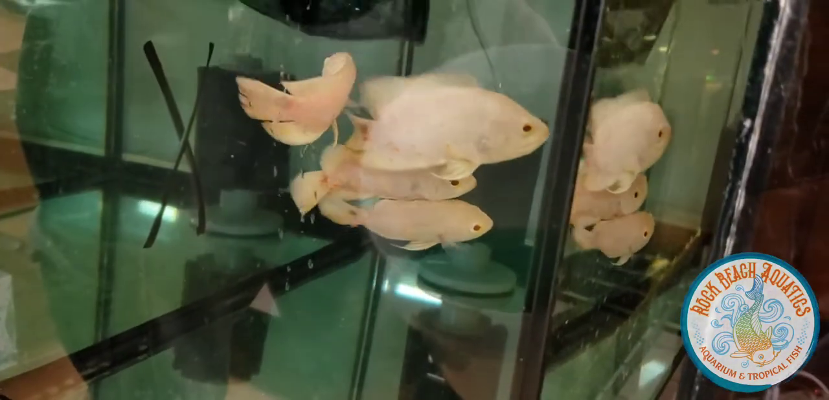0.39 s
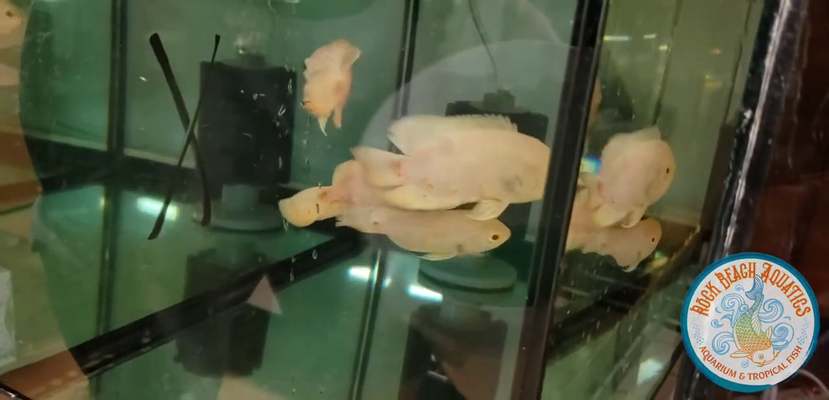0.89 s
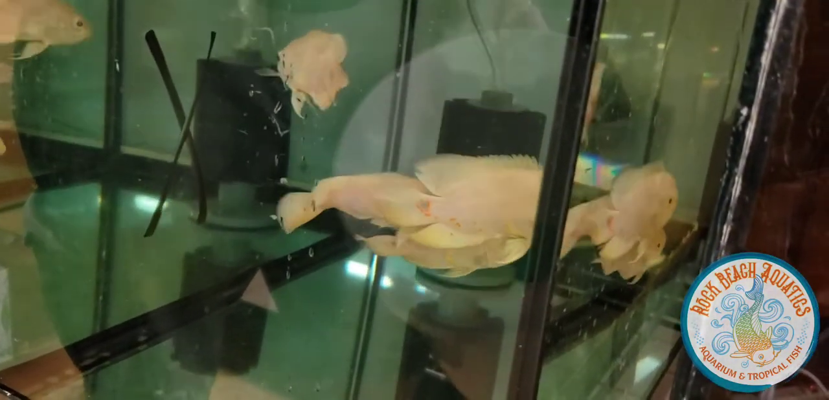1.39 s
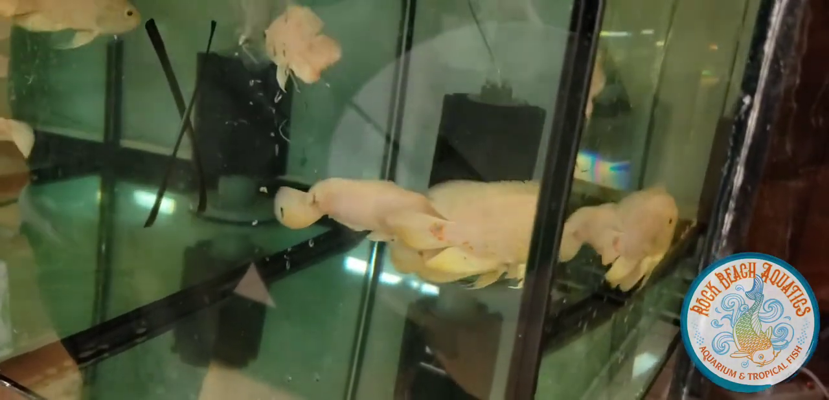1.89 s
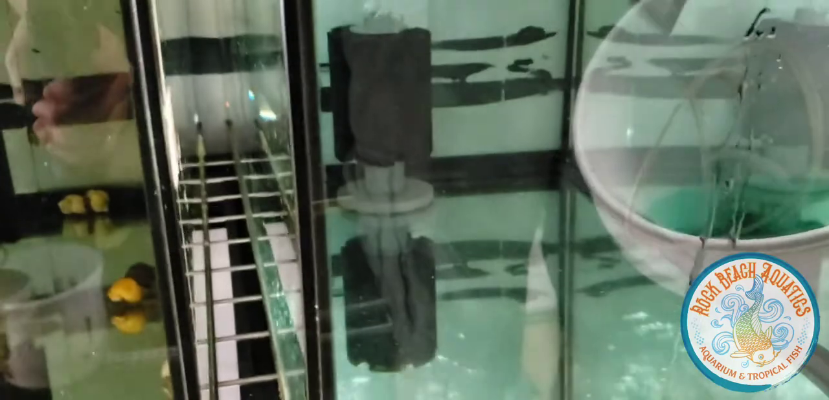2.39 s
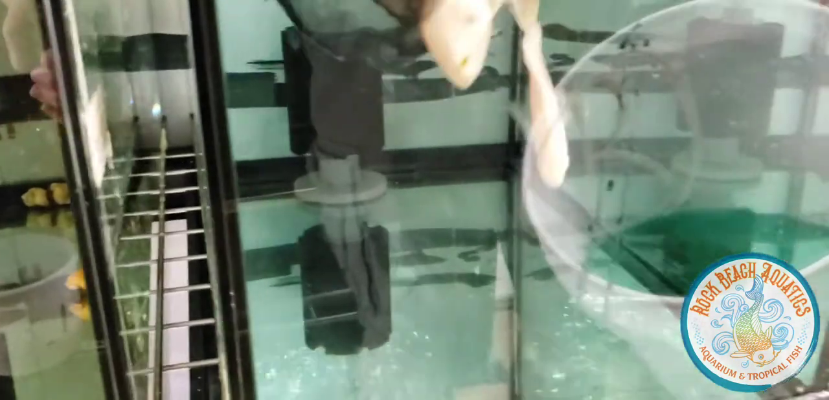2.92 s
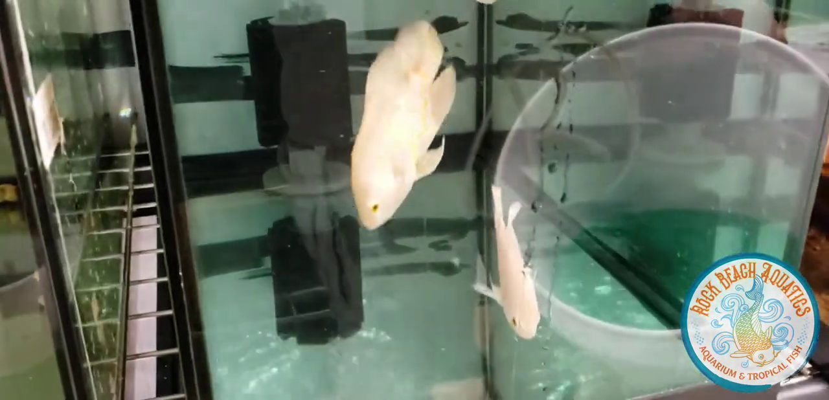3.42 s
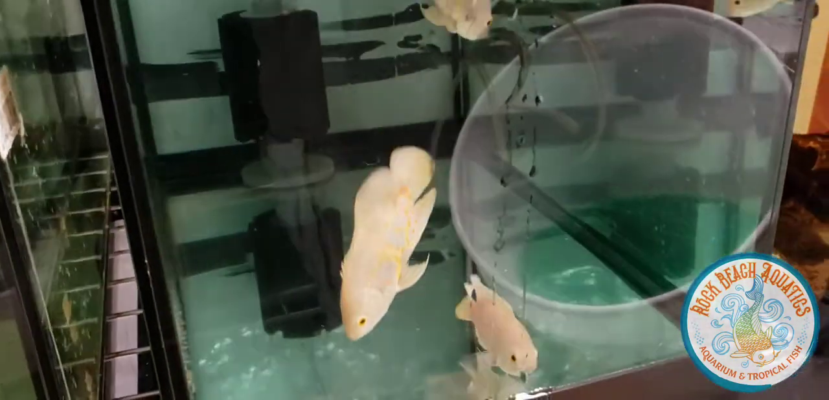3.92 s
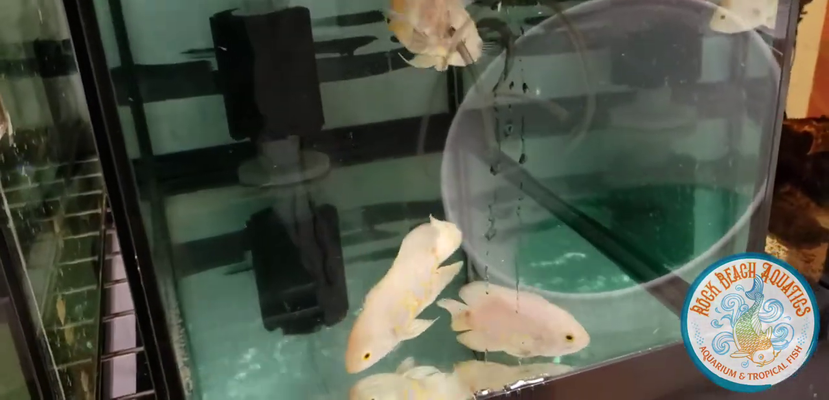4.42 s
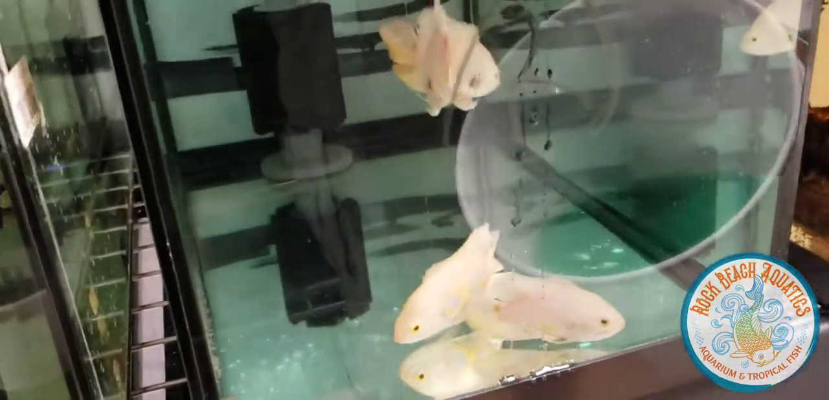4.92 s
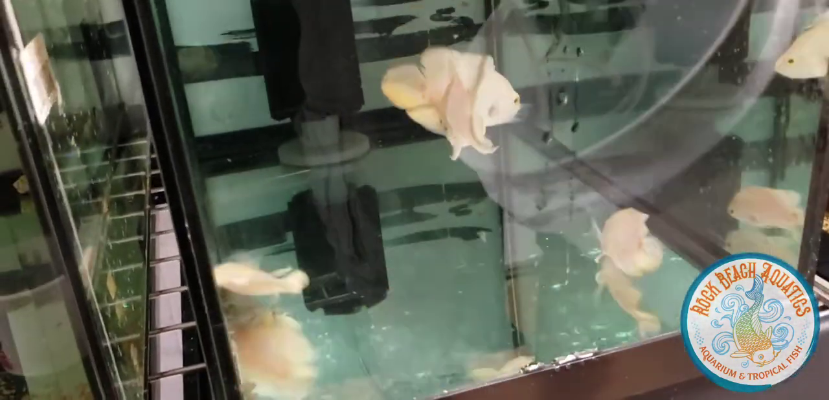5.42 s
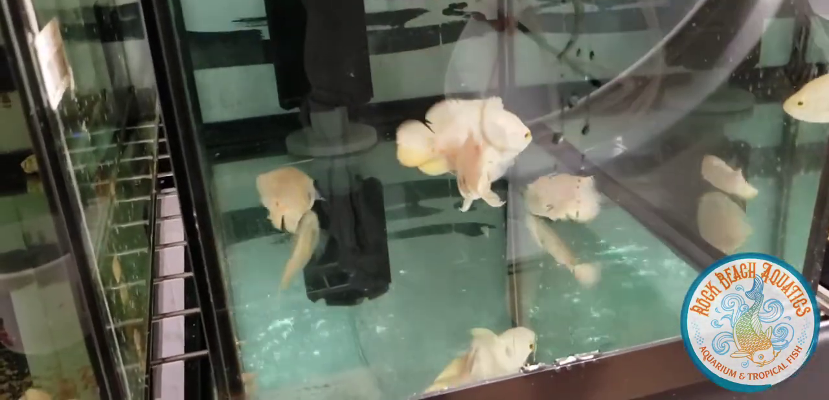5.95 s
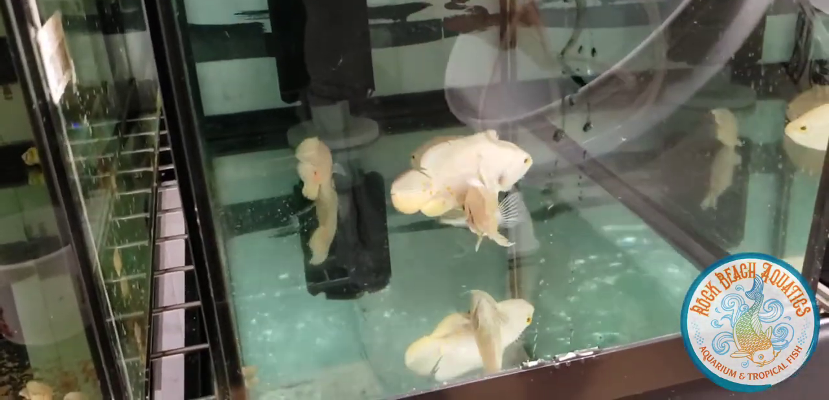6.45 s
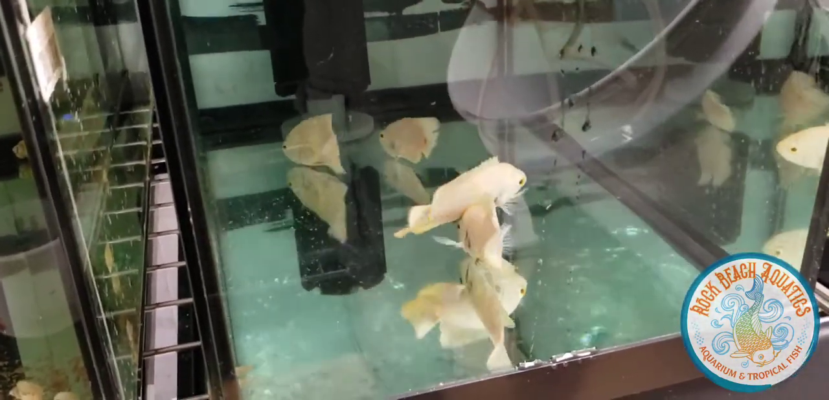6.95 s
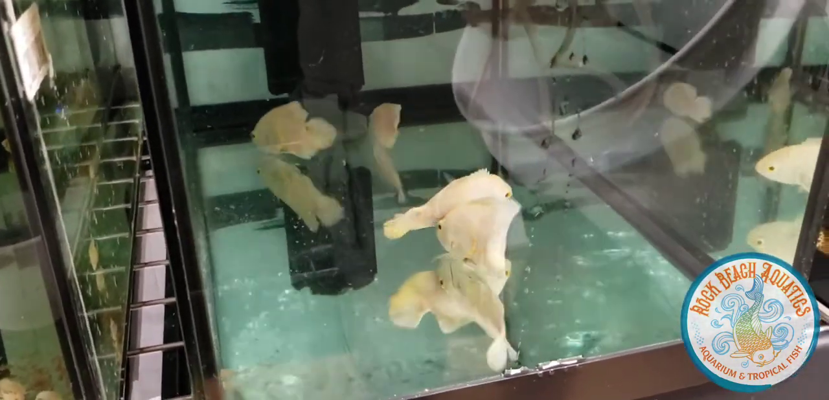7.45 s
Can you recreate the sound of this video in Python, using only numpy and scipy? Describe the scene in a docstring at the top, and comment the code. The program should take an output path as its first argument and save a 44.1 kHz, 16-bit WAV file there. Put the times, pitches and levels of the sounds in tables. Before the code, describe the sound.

Low mains hum of air pumps and gurgling filters in a fish shop, with thin plastic crackles, soft swishes, small knocks and drips close by.

```python
"""Heard first is the mains-pitched hum of air pumps in a fish shop, over gurgling filters and a faint watery hiss.
Harmonic series make the hum, shaped random spectra the wash, and rising resonances the bubbles and drips.
A splice joins two spots in the shop. Close by, thin plastic crackles and swishes as filtered noise bursts
and resonant hiss, and something knocks, thuds and drips lightly."""
import sys
import numpy as np
from scipy import signal
from scipy.fft import rfft, irfft
from scipy.io import wavfile
from scipy.ndimage import uniform_filter1d

SR = 44100
rng = np.random.default_rng(int(sys.argv[2]) if len(sys.argv) > 2 else 0)


def unload_wav(signal):
    """Save mono or channel-first audio to the path in sys.argv[1] as 16-bit WAV at rate SR, clipped to [-1, 1]."""
    wavfile.write(
        sys.argv[1],
        SR,
        np.round(np.clip(np.atleast_2d(signal).T, -1, 1) * 32767).astype(np.int16),
    )


def convert_level_to_amplitude(level_db):
    """Map a level in decibels to its linear amplitude factor."""
    exponent = np.asarray(level_db, float) / 20
    return 10 ** exponent


N = 334278


def evened(x):
    """Normalization: scales a signal to an rms of 1."""
    return x / np.sqrt(np.mean(x ** 2) + 1e-20)


def read(points, hz):
    """Logarithmic pitch scale: interpolates a table along log frequency."""
    table_hz, value = np.transpose(points)
    return np.interp(np.log(hz + 1), np.log(table_hz + 1), value)


def panned(x, pan_db):
    """Interaural level difference: two channels, the left pan_db above the right."""
    return np.array([x * convert_level_to_amplitude(pan_db / 2), x * convert_level_to_amplitude(-pan_db / 2)])


def smooth_noise(width, passes=1):
    """Low-pass noise: a random signal averaged over width samples, at rms 1."""
    noise = rng.standard_normal(N)
    for _ in range(passes):
        noise = uniform_filter1d(noise, width)
    return evened(noise)


def narrowed(x, hz, order):
    """Diffraction: long waves reach both ears alike, so the difference loses its bass."""
    highpass = signal.butter(order, hz, "highpass", fs=SR, output="sos")
    side = signal.sosfilt(highpass, (x[0] - x[1]) / 2)
    return x.mean(0) + np.array([side, -side])


# Reverberation time of the shop: (frequency [Hz], t60 [s])
SHOP_T60 = [(200, 0.18), (1000, 0.4), (4000, 0.21), (12000, 0.21)]


def shop(x):
    """Reverberation: sparse random-sign echoes, each band decaying at its own rate, independent in each ear."""
    taps = np.zeros((2, SR // 2))
    slots = np.arange(200, SR // 2 - 20, 20)
    at = slots + rng.integers(0, 20, (2, len(slots)))
    np.put_along_axis(taps, at, rng.choice([-1., 1.], at.shape), 1)
    hz, t, spectrum = signal.stft(taps, SR, nperseg=256)
    decay = convert_level_to_amplitude(-60 * t / read(SHOP_T60, hz)[:, None])
    tail = signal.istft(spectrum * decay, SR, nperseg=256)[1]
    return signal.fftconvolve(x, tail / np.linalg.norm(tail[0]), axes=1)[:, :N]


MAINS_HZ = 59.98
WAVER_DB, WAVER_S = 0.2, 0.028  # rms of the hum's waver, and width of each average that smooths it
# Interaural difference of the hum, one row a spot: (left-right level [dB], lag of the left ear [rad])
HUM_SIDES = [(0, 0), (-.95, .11)]
# A moment when the hum is at its crest, one a spot: (time [s])
HUM_CRESTS = (2.3198, 2.3347)
# Slow level of the hum, one table a spot: (time [s], level [dB])
HUM_LEVEL = [
    [(0, -29.5), (1.0, -29.5), (1.45, -29), (1.7, -30), (1.95, -29.5), (2.3, -28.5)],
    [(2.35, -27), (2.74, -27), (3.59, -27.5), (4.0, -27.5), (5.35, -27.5), (5.63, -27), (6.6, -27.5),
     (6.75, -27), (7.58, -28)],
]
# Overtones of the pump: (multiple of mains [1], level re hum at first spot [dB], at second [dB],
# lag of the left ear at first spot [rad], at second [rad])
PUMP_OVERTONES = [(2, -23, -33, 0, 0), (3, -36, -40, 0, 0), (4, -31, -35, .5, 1.), (8, -31, -46, 1.8, 1.),
                  (10, -35, -46, 1., 1.), (14, -33, -32, 1.6, 2.5), (21, -42, -45, 1.6, 1.6)]


def pumps(spot):
    """Harmonic series: a mains-driven diaphragm gives a clean fundamental with weak, wavering overtones."""
    t = np.arange(N) / SR
    phase = 2 * np.pi * MAINS_HZ * (t - HUM_CRESTS[spot])
    pan_db, lag = HUM_SIDES[spot]
    ears = np.array([[.5], [-.5]])
    out = np.cos(phase - lag * ears) * panned(1, pan_db)[:, None]
    for multiple, *row in PUMP_OVERTONES:
        db, lag = row[spot], row[2 + spot]
        strength = convert_level_to_amplitude(db + 0.33 * smooth_noise(6000))
        out += strength * np.cos(multiple * phase - lag * ears)
    waver = smooth_noise(round(WAVER_S * SR), passes=2)
    level_db = np.interp(t, *np.transpose(HUM_LEVEL[spot])) + WAVER_DB * waver
    return np.sqrt(2) * convert_level_to_amplitude(level_db) * out  # sqrt(2) turns the rms level into a peak


# Spectrum of the wash of water and air, one table a spot: (frequency [Hz], relative density [dB per Hz])
WASH_SPECTRUM = [
    [(28, -19), (45, 3.5), (85, 3), (110, -10), (200, 2), (270, -9), (400, 4.5), (650, -10), (1200, -16),
     (1900, -13.5), (2900, -19.5), (4200, -25), (8000, -25.5), (13000, -31.5)],
    [(28, -21), (45, 4.5), (85, 2.5), (110, -4.5), (200, -2), (270, -7.5), (370, 3.5), (650, -8),
     (1200, -17.5), (1900, -15), (2900, -22), (4200, -26), (8000, -28), (13000, -30)],
]
# Overall level of the wash, one a spot: (rms level [dB])
WASH_LEVEL = [-42.5, -43]
# Interaural coherence of the wash: (frequency [Hz], left-right correlation [1])
WASH_COHERENCE = [(30, .6), (70, .85), (105, .95), (150, .996), (200, .95), (270, .76), (420, .55),
                  (600, .5), (1100, -.3), (1800, 0.), (12500, -.05)]


def wash(spot):
    """Superposition: many far filters add up to random short-time spectra with drifting patches."""
    frames, hz = N // 512 + 5, np.fft.rfftfreq(2048, 1 / SR)
    a, b, c, d, patches = rng.standard_normal((frames, 1025, 5)).T
    patches = uniform_filter1d(patches, 20, 0)  # across frequency
    patches = evened(uniform_filter1d(patches, 5, 1))  # across time
    same = np.clip(read(WASH_COHERENCE, hz), -1, 1)[:, None]
    left, other = a + 1j * b, c + 1j * d
    spectra = np.array([left, same * left + np.sqrt(1 - same ** 2) * other])
    spectra *= convert_level_to_amplitude(read(WASH_SPECTRUM[spot], hz)[:, None] + 1.07 * patches)
    sound = signal.istft(spectra, nperseg=2048, noverlap=1536)[1][:, :N]
    return convert_level_to_amplitude(WASH_LEVEL[spot]) * evened(sound)


BUBBLES_DB = [-48.5, -50]  # rms level before the bass is narrowed, one a spot
BUBBLES_PER_S = 400  # mean rate over all sizes
# Bubble sizes from the air stones: (pitch [Hz], relative level [dB])
BUBBLE_SIZES = [(200, -19), (330, 6.5), (390, 0.5), (470, -18.5), (650, 7), (900, -2.5), (1500, -9.5)]


def bubbles(count=32):
    """Bubble resonance: each bubble rings a few cycles, rising in pitch as it nears the surface."""
    out = np.zeros((2, N))
    for hz in np.geomspace(BUBBLE_SIZES[0][0], BUBBLE_SIZES[-1][0], count):
        cycles = np.arange(4000) * hz / SR
        envelope = np.exp(-cycles / 5) * (1 - np.exp(-cycles / 0.76))
        plop = np.sin(2 * np.pi * cycles * (1 + 0.0046 * cycles)) * envelope
        starts = rng.random(N) < BUBBLES_PER_S / count / SR
        strength = convert_level_to_amplitude(3 * np.minimum(rng.exponential(1, N), 4))  # 0 to 12 dB
        near = signal.oaconvolve(starts * strength, plop / np.linalg.norm(plop))[:N]
        near *= convert_level_to_amplitude(read(BUBBLE_SIZES, hz))
        side = rng.choice([-1, 1])  # the tanks stand left and right
        out += panned(1, 2.25 * side)[:, None] * [near, np.roll(near, 20 * side)]  # dB; samples
    # the bubbles come from tanks all over the shop, so their echoes keep changing
    turn = 2 * np.pi * 3 * np.arange(N) / SR  # 3 Hz
    echoes = shop(out * np.cos(turn)) + shop(out * np.sin(turn))
    return evened(out + 2.0 * echoes)


def resonate(x, hz, width):
    """Resonance: a one-pole low-pass shifted up to hz, of near unit gain at its centre."""
    carrier = np.exp(2j * np.pi * hz * np.arange(len(x)) / SR)
    r = np.exp(-np.pi * width / SR)
    return 2 * (carrier * signal.lfilter([1 - r], [1, -r], x / carrier)).real


# Faint steady hiss of the air lines: level, left-right difference, lift of the upper bands
HISS_DB, HISS_PAN_DB, HISS_BRIGHT_DB = -59.5, -4.5, 1.4
SWELL_SHARE = 0.52  # part of a swish spent rising
# Resonances of hiss and swishes: (frequency [Hz], bandwidth [Hz], relative level [dB])
SWISH_BANDS = [(4900, 1900, -5), (6000, 5340, 6), (10500, 2300, -1)]
# Soft swishes of plastic or cloth: (time of maximum [s], length [s], level [dB], left-right level [dB],
# lift of the upper bands [dB])
SWISH_STROKES = [(1.982, 0.39, -57.5, 1.2, 5.5), (2.34, 0.78, -53.5, -1.5, -3),
                 (3.32, 0.27, -41.5, 1, -6.5), (3.47, 0.2, -47, 2.2, -13), (4.02, 0.33, -41, 2, -28),
                 (4.257, 0.27, -53, 1, -6), (5.265, 0.36, -53.5, -5, 2.3), (5.62, 1, -57.5, -6, -0.5),
                 (6.1, 0.83, -55, -3, -7), (6.78, .25, -66, -2, -9), (7.11, .4, -55.5, -4, -5)]


def swish():
    """Friction noise: grainy hiss through broad high resonances, steady and in strokes of varied brightness."""
    t = np.arange(N) / SR
    grain = convert_level_to_amplitude(2.0 * smooth_noise(300))
    noise = rng.standard_normal((2, N))
    bands = []
    for hz, width, db in SWISH_BANDS:
        ears = [resonate(resonate(ear, hz, width), hz, width) for ear in noise]
        bands.append(convert_level_to_amplitude(db) * np.array(ears))
    lower, upper = bands[0], sum(bands[1:])
    lower_power = panned(convert_level_to_amplitude(HISS_DB) * np.ones(N), HISS_PAN_DB) ** 2
    upper_power = lower_power * convert_level_to_amplitude(2 * HISS_BRIGHT_DB)
    for s, length, db, pan_db, bright_db in SWISH_STROKES:
        ends = [s - SWELL_SHARE * length, s, s + (1 - SWELL_SHARE) * length]
        power = panned(convert_level_to_amplitude(db) * np.interp(t, ends, [0, 1, 0]), pan_db) ** 2
        lower_power = lower_power + power
        upper_power = upper_power + power * convert_level_to_amplitude(2 * bright_db)
    return grain * (lower * np.sqrt(lower_power) + upper * np.sqrt(upper_power)) / np.std(upper)


DRIP_RISE_S, DRIP_CLIMB_PER_S = 0.00098, 2.6  # onset time; pitch gain as a fraction of the start, per second
# Drips that ring clear: (time [s], level before onset and decay [dB], starting pitch [Hz], t60 [s],
# left-right level [dB])
DRIP_RINGS = [(0.2, -39.5, 895, 0.12, -3.5), (2.0825, -30, 3200, 0.03, 6.5), (2.941, -45, 2180, .09, 0),
              (6.838, -26.5, 1400, 0.06, 6)]


def drips():
    """Bubble resonance: each drip traps a bubble that rings and decays while its pitch climbs."""
    out, t = np.zeros((2, N)), np.arange(6000) / SR
    for s, db, hz, t60, pan_db in DRIP_RINGS:
        tone = np.sin(2 * np.pi * hz * t * (1 + DRIP_CLIMB_PER_S * t / 2))
        ring = tone * convert_level_to_amplitude(db - 60 * t / t60) * (1 - np.exp(-t / DRIP_RISE_S))
        out[:, round(s * SR):][:, :len(t)] += panned(ring, pan_db)
    return out


EAR_LAG = 2.2  # samples the far ear lags for each dB it is softer, up to 10 dB


def snaps(rows, t60, rise_s, first=2.3):
    """Impulsive excitation: bursts of uneven tiny cracks in one band, reaching the far ear later."""
    out, t = np.zeros((2, N)), np.arange(6000) / SR
    for s, db, hz, octaves, pan_db in rows:
        uneven = convert_level_to_amplitude(0.5 * np.repeat(rng.standard_normal(len(t) // 30), 30))
        envelope = uneven * convert_level_to_amplitude(-60 * t / t60) * (1 - np.exp(-t / rise_s))
        cracks = rng.standard_normal((3, len(t))) * envelope
        cracks[2, round(3 * rise_s * SR)] += first  # one added crack near the onset
        edges = np.clip(hz * 2 ** np.array([-octaves / 2, octaves / 2]), 50, 20000)
        bandpass = signal.butter(3, edges, "bandpass", fs=SR, output="sos")
        ears = signal.sosfilt(bandpass, cracks[2] + .5 * cracks[:2])  # shared plus each ear's own
        early_rms = ears[:, :round(t60 * SR / 4)].std()
        ears *= panned(convert_level_to_amplitude(db), pan_db)[:, None] / (4 * early_rms)  # takes peaks as 4 times the rms
        for ear, softer_db in enumerate((-pan_db, pan_db)):
            start = round(s * SR + EAR_LAG * np.clip(softer_db, 0, 10))
            part = out[ear, start:][:len(t)]
            part += ears[ear, :len(part)]
    return out


CRACKLE_T60_S = 0.016
FAINT_DB, FAINT_HZ, FAINT_OCTAVES = -46, 5500, 1.2  # centre of the faint crackles' levels and pitches; width
# Crackles of thin plastic: (time [s], nominal peak [dB], centre frequency [Hz], bandwidth [octaves])
PLASTIC_CRACKLES = [(1.7527, -32.5, 6460, 0.68), (1.774, -36.5, 11000, .5), (1.842, -33, 5570, 3.5),
                    (1.8633, -30.5, 7110, 1.2), (1.874, -35, 5500, .7), (1.9098, -36, 4910, 2.4),
                    (1.9313, -34, 4960, 1.2), (1.9887, -35, 7600, 0.95), (2.001, -30, 5400, 2.7),
                    (2.077, -24, 5730, 1.3), (2.0813, -24, 6000, 2.2), (2.0835, -39, 8500, 1.1),
                    (2.117, -30.5, 6240, 0.72), (2.164, -34.5, 7660, 1.4), (2.8955, -36, 6510, 1.7),
                    (2.9254, -17, 7600, .9), (2.9278, -14, 8500, .75), (2.9305, -30, 6500, 1.5),
                    (2.9335, -28, 5500, 1.05), (2.936, -24, 5500, 1.2), (2.944, -30, 6000, 1.4),
                    (3.74, -33, 5600, 1.1), (4.164, -30.5, 6400, 1.2), (4.39, -36, 6000, .9),
                    (4.83, -43, 8800, 0.55), (5.205, -39, 6000, 0.8), (5.315, -41, 7000, .9),
                    (5.159, -30, 5260, 0.49), (5.669, -45, 4900, 1.1), (5.697, -27, 7650, 0.74),
                    (5.759, -31, 5070, 1.6), (5.8243, -38, 5500, 1.2), (5.865, -33, 4910, 1.2),
                    (5.8917, -33, 6640, 1.3), (5.92, -31, 7150, 0.48), (6.0124, -42, 4500, .7),
                    (6.148, -42, 5200, .8), (6.175, -40, 4500, .6), (6.2257, -36, 6230, 2.5),
                    (6.595, -38.5, 5230, 1.5), (6.814, -28.5, 7460, 2.8), (6.8332, -25.5, 4400, 1.3),
                    (6.8494, -33, 5740, 2.9), (6.8852, -31.5, 6500, 1.5), (6.919, -35, 7500, .7),
                    (6.9262, -20.5, 5700, .5), (6.929, -29, 5200, .35), (6.927, -32, 9500, .5),
                    (7.0722, -32, 7990, 0.74), (7.2113, -39, 5570, 1.1), (7.2485, -31.5, 5730, 1.3),
                    (7.324, -23, 6700, 0.94), (7.329, -31, 5000, 1.8)]
# Direction of the handled plastic: (time [s], left-right level [dB])
HAND_SIDE = [(1.75, 7), (2.12, 7.5), (2.2, -0.1), (5.2, -2), (5.75, -9.5), (5.92, -4), (6.8, -7),
             (6.93, -11.5), (7.08, -15.5), (7.3, 0)]


def crackles(count=12):
    """Buckling of a thin sheet: listed crackles and faint random ones near them, from the side of the hand."""
    near, shift, size, colour = rng.random((count, 4)).T
    neighbour = (near * len(PLASTIC_CRACKLES)).astype(int)
    times = np.array(PLASTIC_CRACKLES)[neighbour, 0] + .3 * (shift - .5)
    levels = FAINT_DB + 6 * (size - .5)
    pitches = FAINT_HZ * 2 ** (0.38 * (colour - .5))
    faint = [(s, db, hz, FAINT_OCTAVES) for s, db, hz in zip(times, levels, pitches)]
    rows = [(*row, np.interp(row[0], *np.transpose(HAND_SIDE))) for row in PLASTIC_CRACKLES + faint]
    return snaps(rows, CRACKLE_T60_S, rise_s=.0003)


KNOCK_T60_S = .031
FIRST_BLOW = 16  # height of a knock's opening blow, against unit-rms cracks before their envelope
# A short rattle of such knocks: start, length, mean level; lower band, ratio of the upper band, width, side
RATTLE_S, RATTLE_LENGTH_S, RATTLE_DB = 6.802, .112, -35
RATTLE_HZ, RATTLE_UPPER, RATTLE_OCTAVES, RATTLE_PAN_DB = 1470, 1.61, 0.58, 2
# Duller knocks: (time [s], nominal peak [dB], centre frequency [Hz], bandwidth [octaves],
# left-right level [dB])
SINGLE_KNOCKS = [(2.021, -31.5, 2180, 0.57, 2), (2.031, -36.5, 2280, .7, 6), (2.164, -32, 2630, 1, -1.5),
                 (2.223, -19.5, 845, 1.6, 2.5), (2.238, -33, 746, 2.1, 9), (2.59, -30.5, 980, 0.52, 3.5),
                 (3.273, -29.5, 925, 0.55, -8), (5.865, -32.5, 3450, 0.57, -7),
                 (5.94, -38, 1680, 0.23, -1.5), (6.331, -34, 1200, 1.2, -6), (6.365, -42, 1700, 0.96, -2.5),
                 (6.69, -32, 800, 0.68, 6), (6.86, -33, 3800, 0.46, -2), (6.949, -35, 2020, 0.22, -3),
                 (6.961, -38, 2100, 0.28, -2), (6.974, -38, 2050, .3, -3), (7.25, -37, 1870, 0.3, -4),
                 (7.323, -28, 2820, 0.75, -5.5)]


def knocks(count=22):
    """Impact: one strong blow leads each decaying knock; an uneven rattle repeats it in two bands."""
    shift, size, colour, side = rng.random((count, 4)).T - .5
    order = np.arange(count)
    done = (order + .5 + 0.62 * shift) / count
    upper = np.where(order % 3 == 1, RATTLE_UPPER, 1)  # every third knock is in the upper band
    rattle = np.transpose([RATTLE_S + RATTLE_LENGTH_S * done,
                           RATTLE_DB + 5 * size,
                           RATTLE_HZ * upper * 2 ** (0.46 * colour),
                           RATTLE_OCTAVES * np.ones(count),
                           RATTLE_PAN_DB + 8 * side])
    return snaps([*SINGLE_KNOCKS, *rattle], KNOCK_T60_S, rise_s=0.000645, first=FIRST_BLOW)


# Dull thuds: (time [s], reference level [dB], left-right level [dB], spectral tilt about 1 kHz [dB per octave])
THUD_BLOWS = [(6.3086, -28, -3, -0.5), (6.346, -29.5, -3, -1.5)]
# Parts of the struck body: (centre frequency [Hz], relative level [dB], t60 [s], rise time [s])
THUD_PARTS = [(602, -2, 0.065, 0.00411), (1205, -2.3, 0.039, 0.00174), (2120, -2, 0.05, 0.00079),
              (3800, -8, 0.017, 0.00035)]


def thuds():
    """Modal damping: every thud shakes the same body in bands of cracks, the highest dying first."""
    out = np.zeros((2, N))
    for hz, part_db, t60, rise_s in THUD_PARTS:
        rows = []
        for s, db, pan_db, tilt_db in THUD_BLOWS:
            rows.append((s, db + part_db + tilt_db * np.log2(hz / 1000), hz, 0.9, pan_db))
        out += snaps(rows, t60, rise_s, first=0.5)
    return out


SPLICE_S, FADE_S = 2.3215, 0.012  # the second spot cuts in here; time of a full fade from zero


def spliced(first, second):
    """Amplitude gating: the first spot stops dead; the second starts at 5.5 % and fades up."""
    t = np.arange(N) / SR - SPLICE_S
    return np.where(t < 0, first, second * np.clip(t / FADE_S + 0.055, 0, 1))


MONO_BELOW_HZ = 175  # at the first spot the bass is the same in both ears
CRACKLE_ECHO_DB, KNOCK_ECHO_DB = -9, -9.5


def scene():
    """Superposition: two spots of hum, wash and bubbles, spliced, under the close sounds and their echo."""
    plops = narrowed(bubbles(), 350, order=3)
    first, second = (pumps(k) + wash(k) + convert_level_to_amplitude(BUBBLES_DB[k]) * plops for k in range(2))
    background = spliced(narrowed(first, MONO_BELOW_HZ, order=6), second)
    sharp = crackles()
    dull = knocks() + thuds() + drips()
    echo = shop(convert_level_to_amplitude(CRACKLE_ECHO_DB) * sharp + convert_level_to_amplitude(KNOCK_ECHO_DB) * dull)
    return background + swish() + sharp + dull + echo


def roll_off(x):
    """The treble ends steeply here."""
    return signal.sosfilt(signal.butter(12, 13150, fs=SR, output="sos"), x)


# Response of the small microphones: (frequency [Hz], gain [dB])
MICROPHONE_RESPONSE = [(2300, 0), (2700, -2), (3850, -2.5), (4100, 3.5), (5500, 0.5), (11200, 0.5),
                       (12000, 1), (12700, -19), (14000, -38)]


def record(dry):
    """Frequency response: small microphones have a hollow below their treble peak and dull at the top."""
    gain = convert_level_to_amplitude(read(MICROPHONE_RESPONSE, np.fft.rfftfreq(N, 1 / SR)))
    mix = irfft(rfft(dry) * gain, N)
    return roll_off(mix)


dry = scene()
out = record(dry)
unload_wav(out)
```